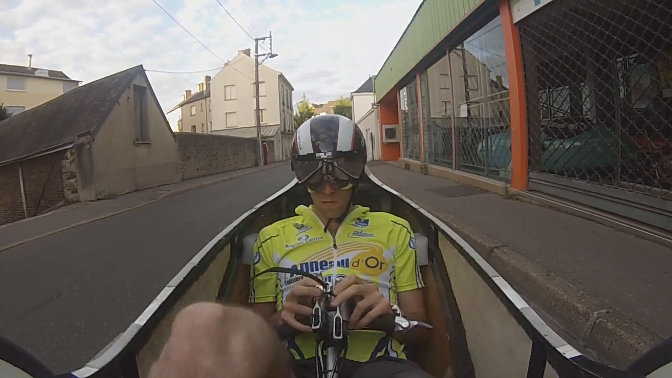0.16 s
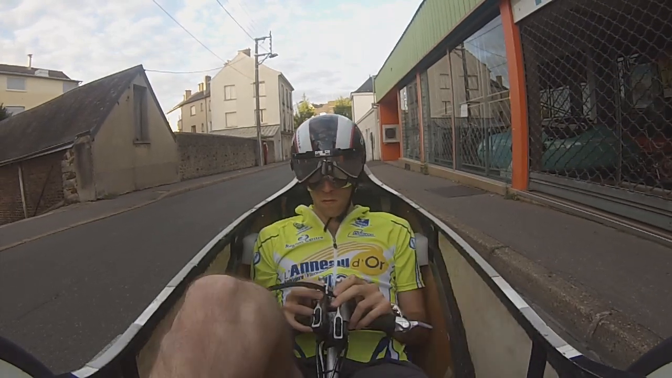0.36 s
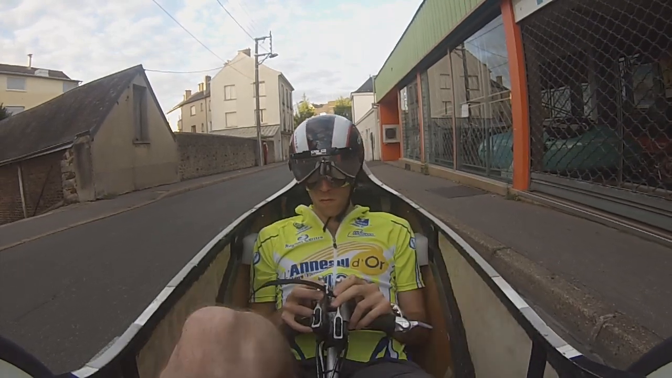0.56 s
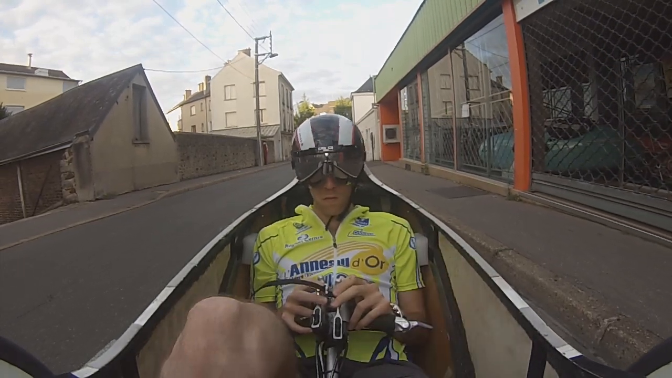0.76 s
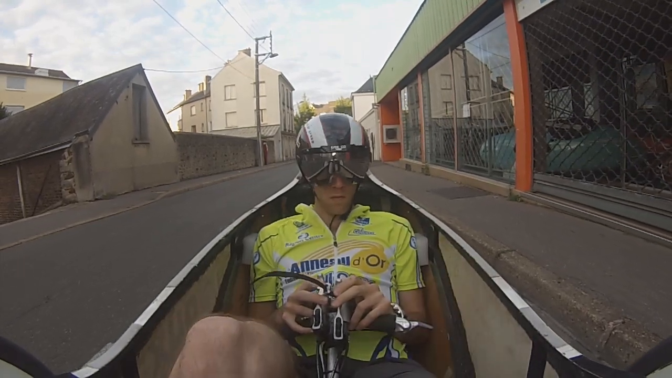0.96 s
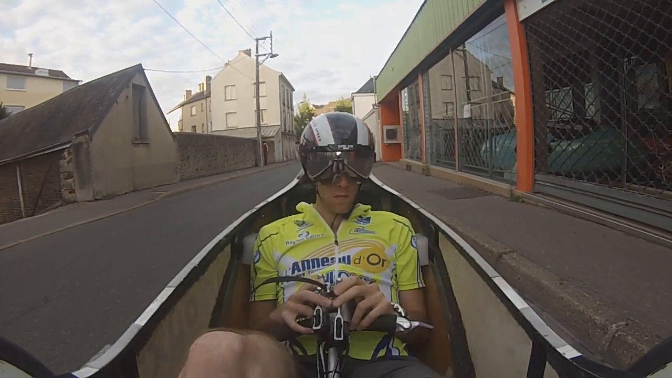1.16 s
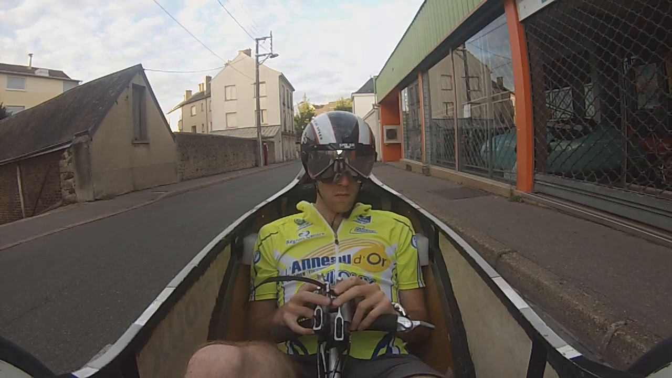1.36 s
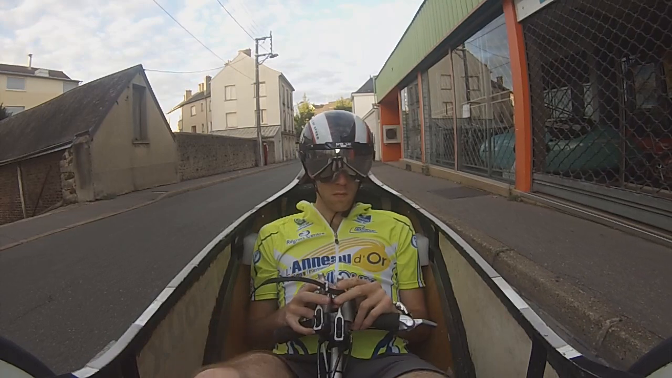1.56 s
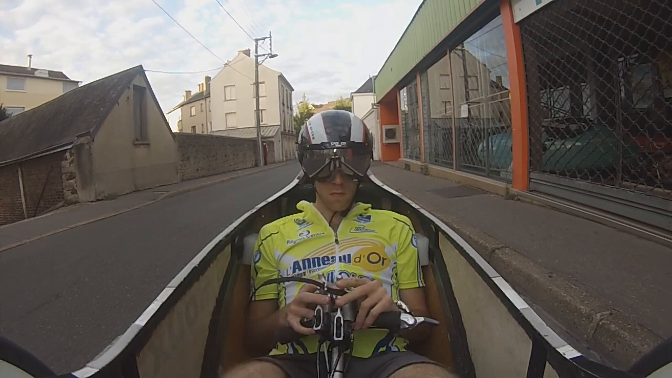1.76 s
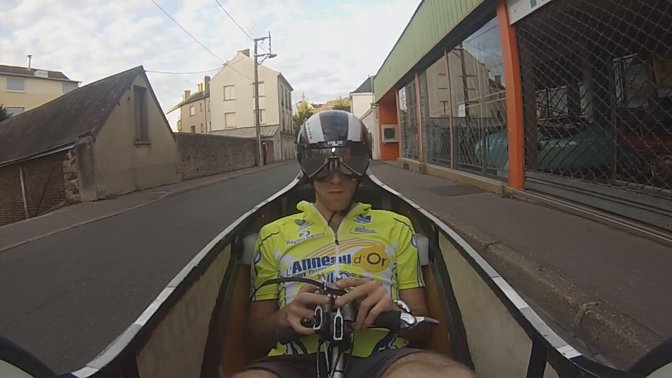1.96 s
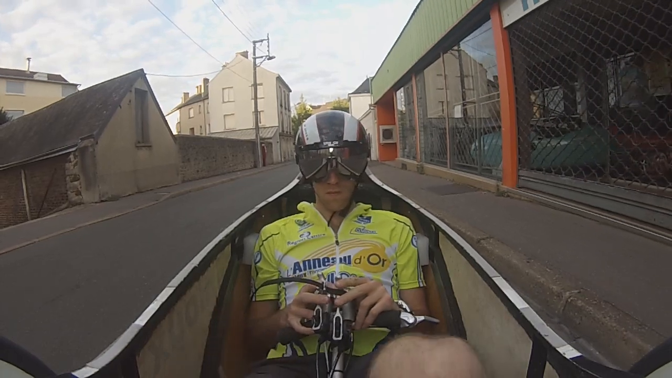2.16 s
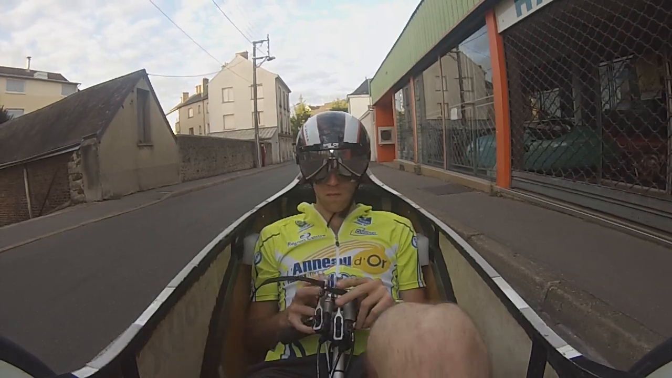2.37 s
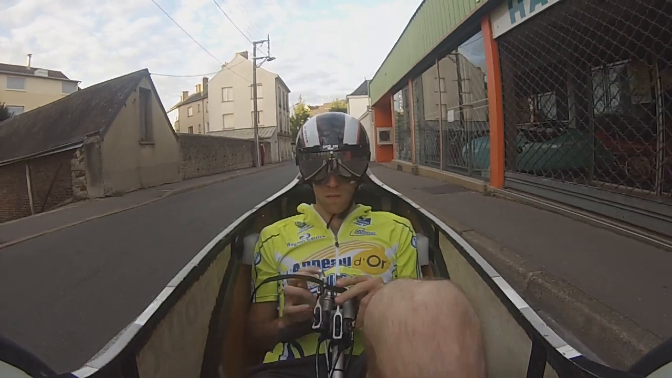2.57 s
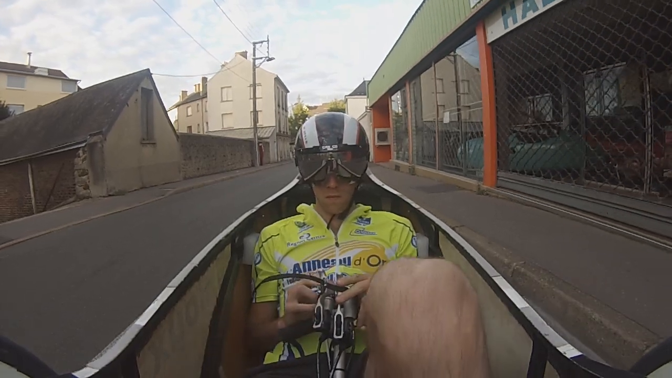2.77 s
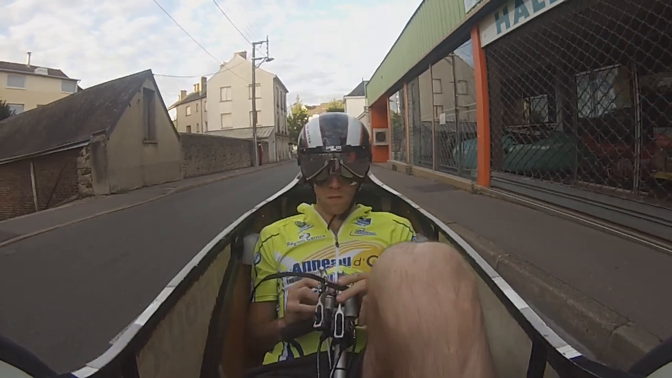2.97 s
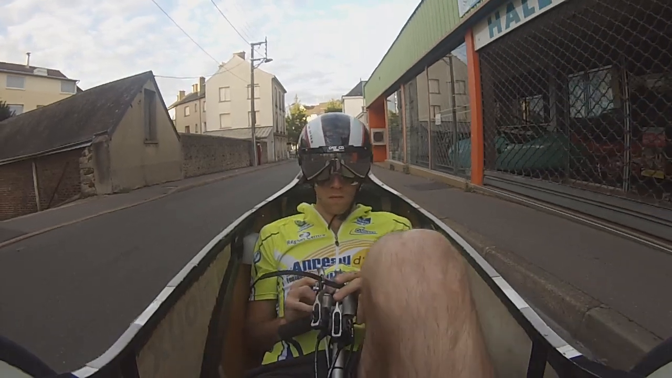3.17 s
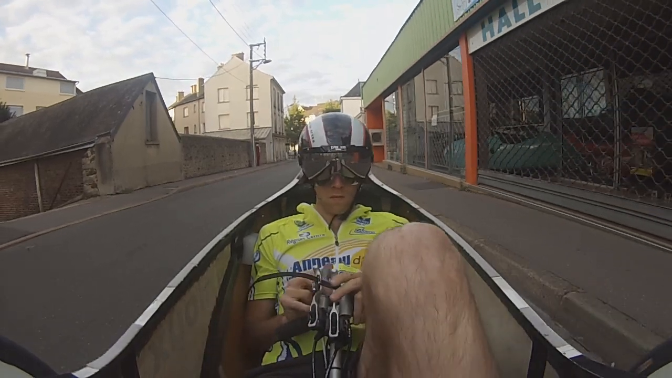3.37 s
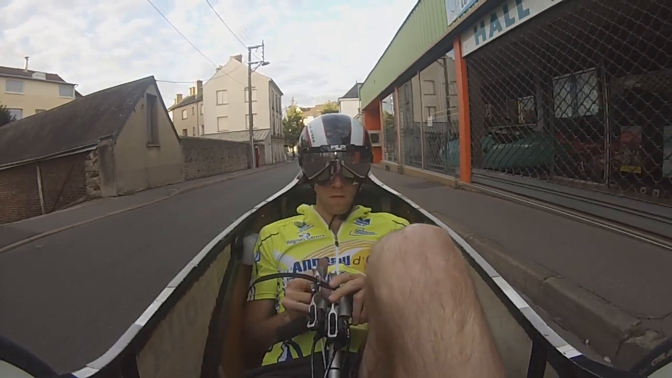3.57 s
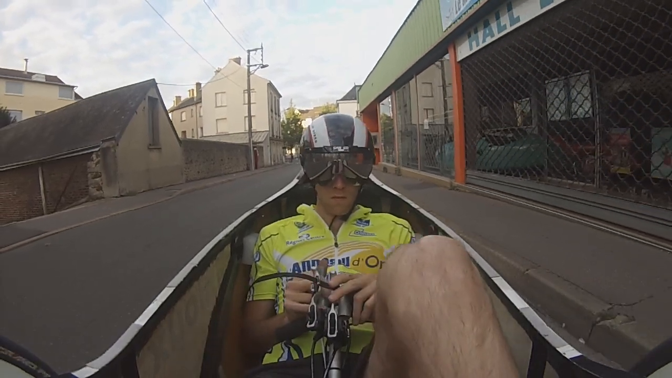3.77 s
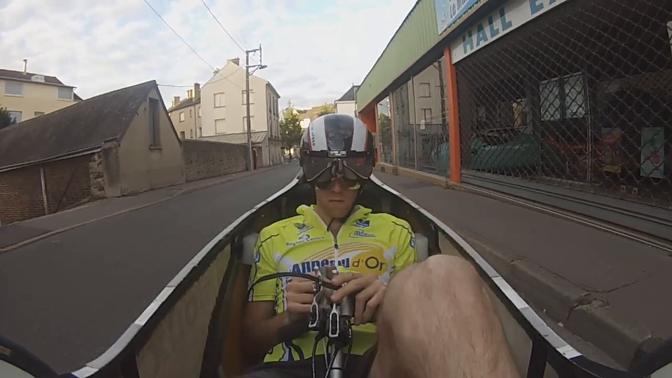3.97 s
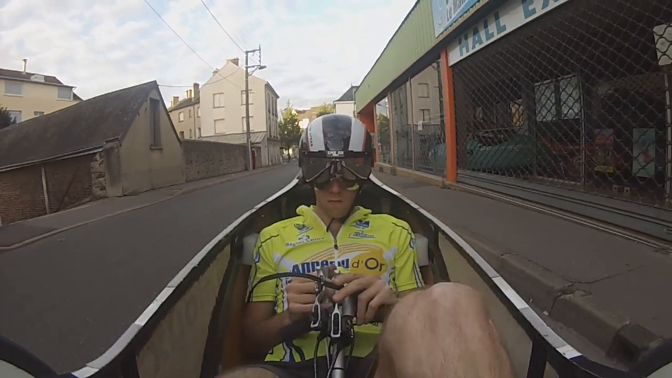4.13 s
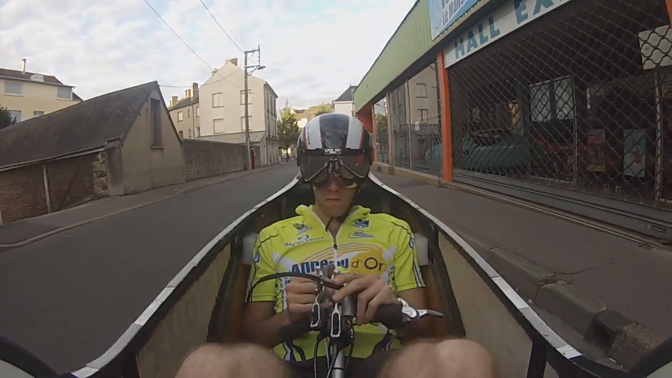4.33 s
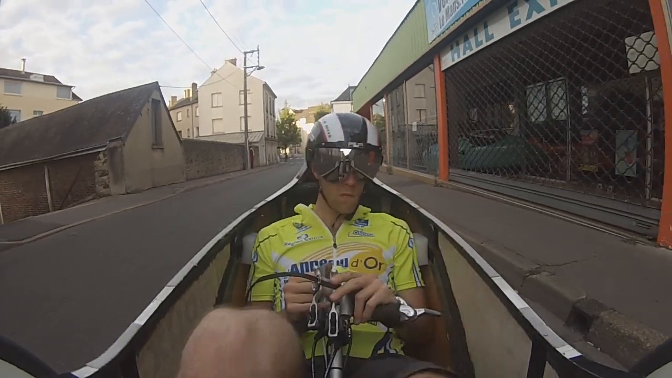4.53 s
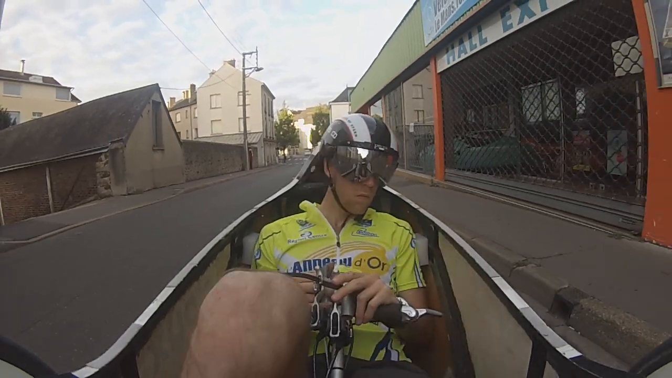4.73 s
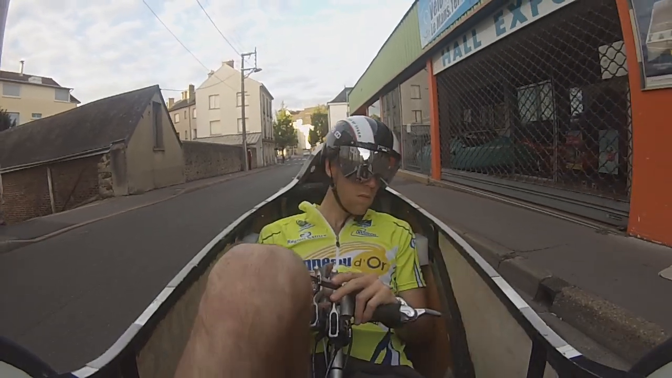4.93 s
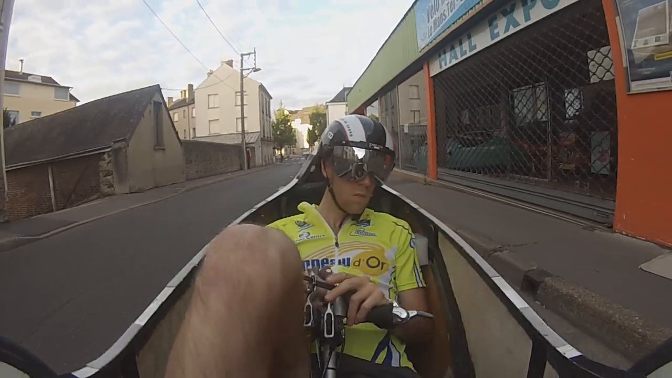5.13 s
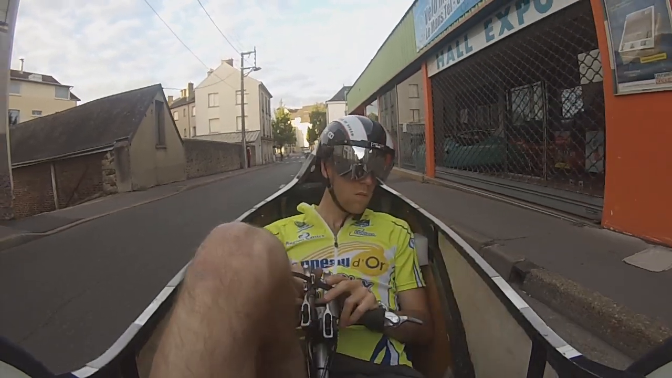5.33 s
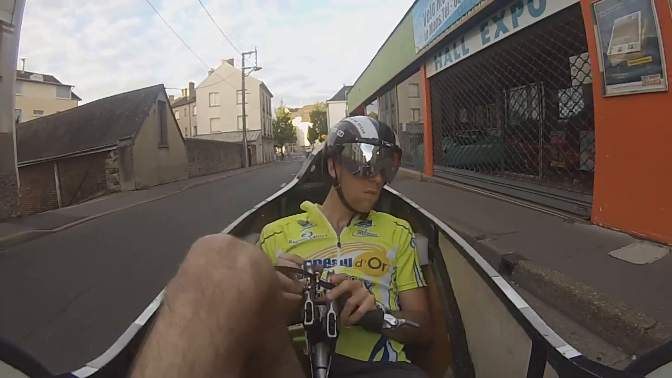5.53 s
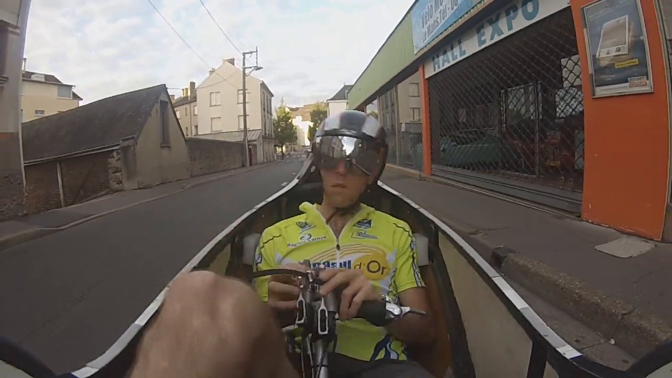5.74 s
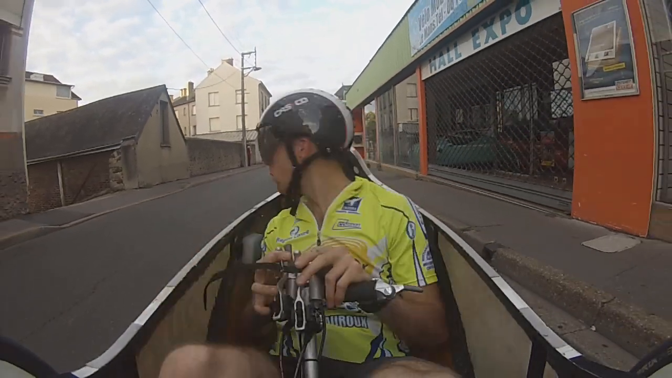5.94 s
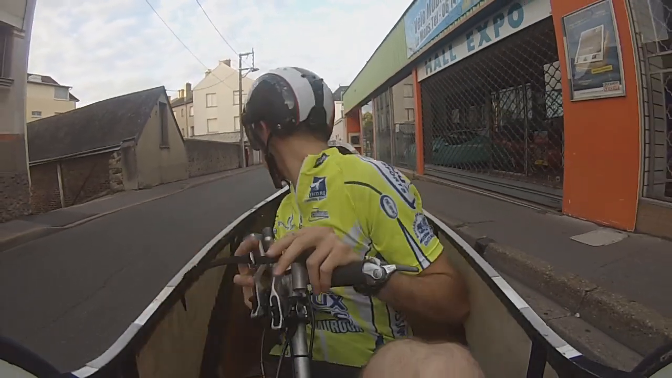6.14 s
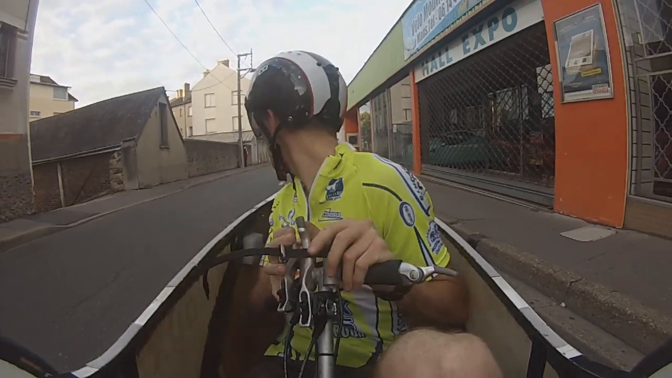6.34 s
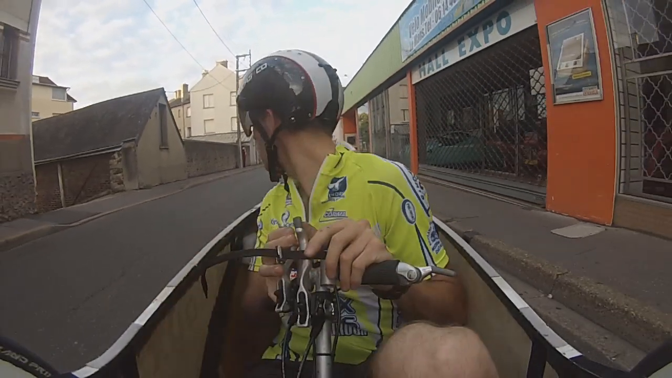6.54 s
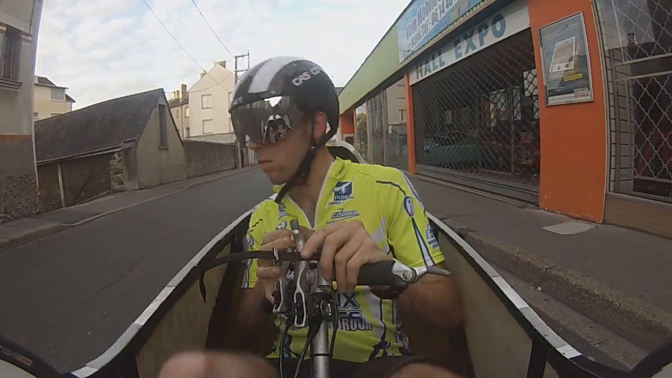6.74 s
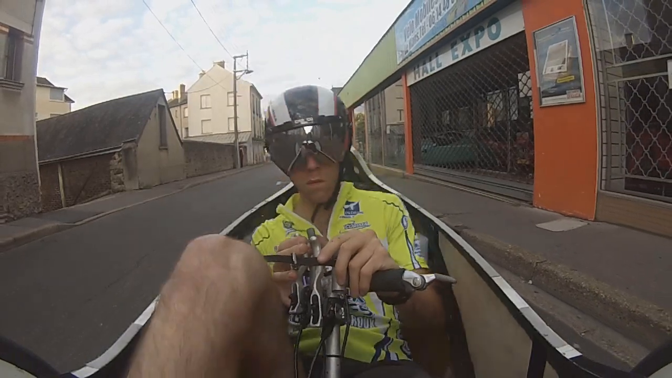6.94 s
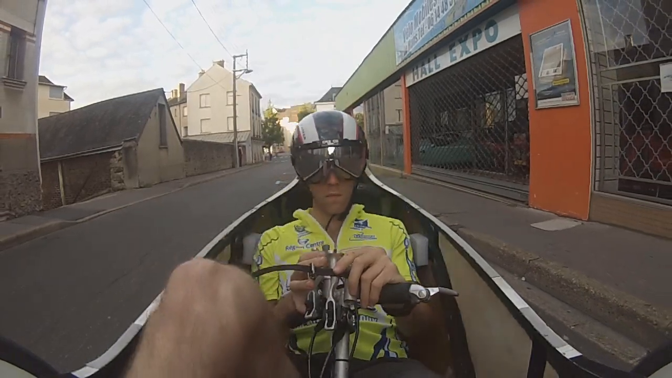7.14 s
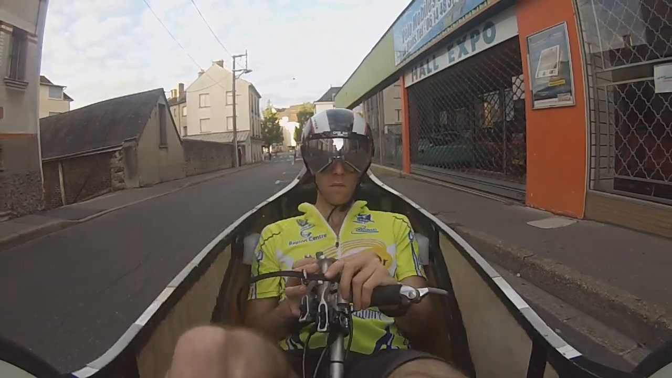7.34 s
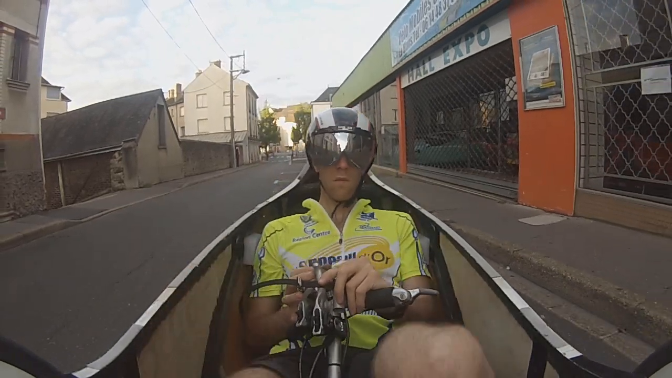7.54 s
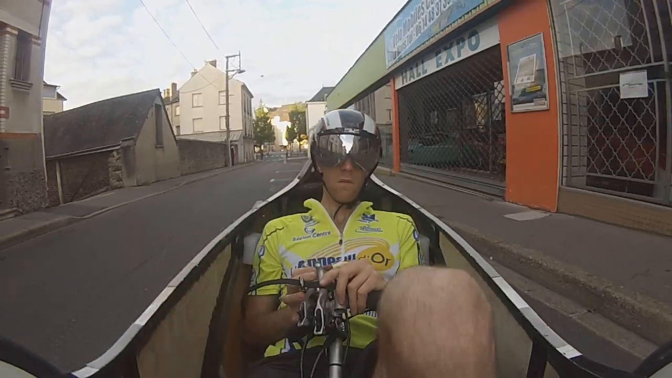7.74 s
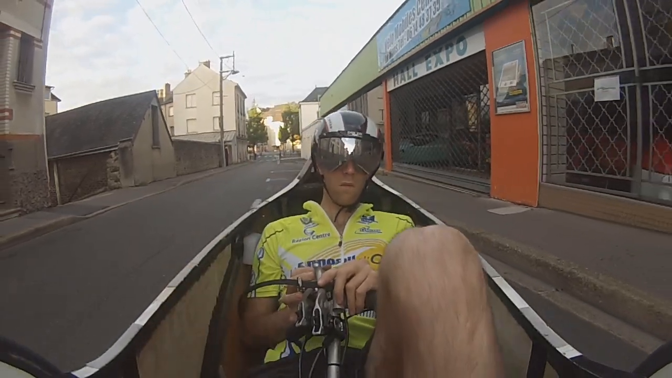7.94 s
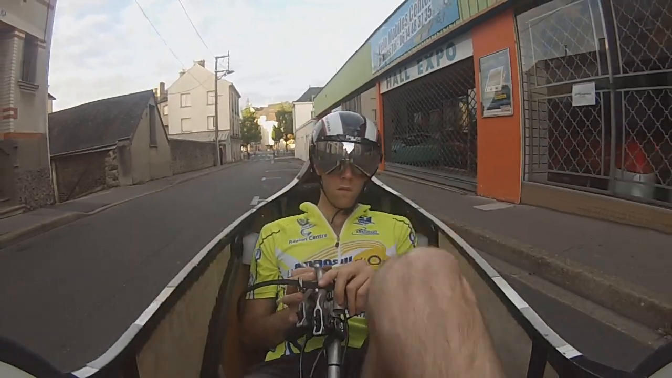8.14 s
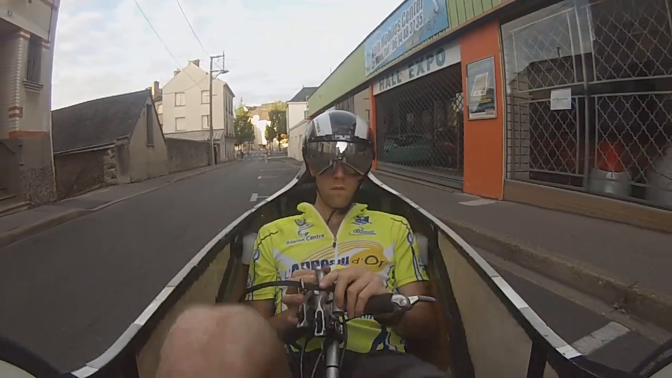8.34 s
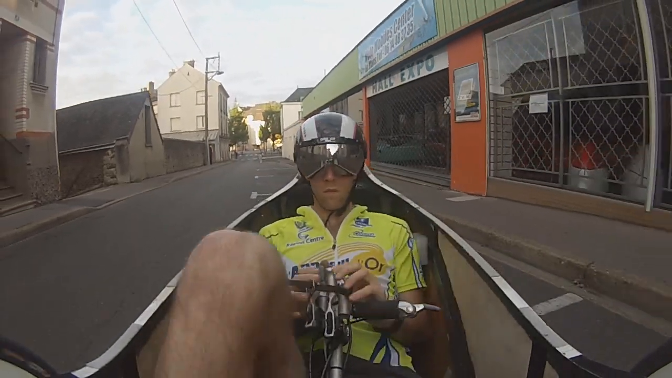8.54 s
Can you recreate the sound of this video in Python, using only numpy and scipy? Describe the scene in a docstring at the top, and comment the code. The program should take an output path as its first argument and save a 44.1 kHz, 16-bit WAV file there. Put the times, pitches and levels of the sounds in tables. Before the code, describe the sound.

Close on the hollow shell of a pedal vehicle in a street. It starts nearly silent, with small ticks, dull knocks and low rocking swells. A quick run of shifter clicks follows, then a cluster of loud, boomy body knocks. Softer bumps and chain whirr continue as the road rumble grows, with one final heavy bang near the end.

```python
"""A street, heard from the hollow shell of a velomobile that pulls away.
Filtered noise makes the drumming of the road, the whirr of the chain and a thin hiss with a flickering top.
The rocking body swells as a low tone of wandering pitch; metal parts sing as thin, unsteady tones.
Ticks, knocks, soft bumps and shifter clicks excite decaying modes and noise bursts, and the shell booms.
A limiter turns everything down for a moment after the highest peaks."""
import sys
import numpy as np
from scipy import signal
from scipy.fft import rfft, irfft, next_fast_len
from scipy.io import wavfile
from scipy.ndimage import uniform_filter1d, minimum_filter1d

SR = 44100
rng = np.random.default_rng(int(sys.argv[2]) if len(sys.argv) > 2 else 0)


def int16_out(signal):
    """Quantize to a 16-bit WAV file."""
    q = np.round(np.clip(np.atleast_2d(signal).T, -1, 1) * 32767)
    wavfile.write(sys.argv[1], SR, q.astype(np.int16))


N = 379260  # samples
T = np.arange(N) / SR
HIT_SIZE = SR // 2  # half a second for each blow
HIT_T = np.arange(HIT_SIZE) / SR
MIDDLE_PANEL_HZ = 237

# road noise: t/s, level of the hollow rumble/dB, level of the panel drumming/dB
ROAD_LEVELS = [(0.0, -49.5, -52), (0.27, -44.5, -44.5), (0.45, -50.5, -54), (0.6, -44, -50),
               (1.15, -47.5, -49), (1.33, -57.5, -57), (1.72, -54.5, -56), (1.95, -43.5, -53.5),
               (3.3, -35.5, -49), (3.68, -29.5, -46.5), (4.1, -38.5, -51), (4.6, -31.5, -37),
               (5.25, -34.5, -43.5), (6.42, -41, -52), (6.88, -38.5, -44), (7.15, -45, -58.5),
               (7.35, -35, -46.5), (8.1, -27, -35), (8.6, -24.5, -36)]
# air and body modes of the shell: nominal f/Hz, relative level/dB, t60/s
SHELL_MODES = [(111, -46.5, 0.087), (134.1, 4, 0.21), (181.2, 3, 0.15)]
# panel modes of the shell: nominal f/Hz, relative level/dB, t60/s
WALL_MODES = [(238.6, -3, 0.24), (264.7, -6.5, 0.2), (289.7, -1, 0.14), (340.3, -2.5, 0.09),
              (367.4, -3, 0.19), (432.4, 1, 0.062)]
# higher modes of the stiff ribs and rim: nominal f/Hz, relative level/dB, t60/s
RIB_MODES = [(446.4, 3, 0.2), (484, 11.5, 0.14), (535, -4, 0.31), (592, -0.5, 0.025), (603, -2, 0.14),
             (742, 4.5, 0.095), (790, -10.5, 0.18)]


def undb(db):
    """Decibels to amplitude ratio: 20 dB is a factor of ten."""
    return 10 ** (np.asarray(db) / 20)


def unit(x):
    """Normalise the mean power: rms 1."""
    return x / np.sqrt(np.mean(x ** 2))


def unit_hit(x):
    """Normalise the energy of a blow to that of 30 ms at rms 1."""
    return x / np.sqrt(np.sum(x ** 2) / (.03 * SR))


def curves(table):
    """Linear interpolation: each column after the time as a value per sample."""
    s, *columns = np.transpose(table)
    return [np.interp(T, s, c) for c in columns]


def walk(rate):
    """Smoothed random process: levels held 1 / rate s and averaged twice, at rms 1."""
    k = max(int(SR / rate), 1)
    steps = np.repeat(rng.standard_normal(N // k + 1), k)
    slewed = uniform_filter1d(uniform_filter1d(steps, k), k)
    return unit(slewed[:N])


def colour(x, points, peaks=()):
    """Minimum-phase filter: an outline (f/Hz, level/dB) with steep skirts and extra resonances."""
    size = 2 * next_fast_len(len(x) // 2 + 2048)
    f = np.maximum(np.arange(size // 2 + 1) * SR / size, 1)
    hz, db = np.transpose(points)
    octaves_outside = np.abs(np.log2(f / np.clip(f, hz.min(), hz.max())))
    gain_db = np.interp(np.log(f), np.log(hz), db) - np.minimum(30 * octaves_outside, 90)
    for centre, width, lift in peaks:
        gain_db = gain_db + lift / (1 + (2 * (f - centre) / width) ** 2)
    # folding the cepstrum onto positive time makes the filter causal
    cepstrum = irfft(np.log(undb(gain_db)))
    cepstrum[1:size // 2] *= 2
    cepstrum[size // 2 + 1:] = 0
    response = np.exp(rfft(cepstrum))
    return irfft(rfft(x, size) * response)[:len(x)]


def fade(t60):
    """Exponential damping: a fall of 60 dB in t60 seconds."""
    return np.exp(-np.log(1000) * HIT_T / t60)


def burst(t60, tail_db, tail_t60):
    """High modal density: modes too crowded to separate act as noise with two decay rates."""
    return rng.standard_normal(HIT_SIZE) * (fade(t60) + undb(tail_db) * fade(tail_t60))


def add(out, s, x):
    """Superposition: mix a sound in at time s."""
    i = max(int(s * SR), 0)
    out[i:i + len(x)] += x[:N - i]


def ring(modes, scatter_db, rise_s, favoured_hz=1, focus_db=0):
    """Modal synthesis: the place of the blow favours modes near one pitch, by focus_db an octave."""
    hz, db, t60 = np.transpose(modes)
    level_chance, pitch_chance, phase_chance = rng.standard_normal((len(hz), 3)).T
    size = undb(db - focus_db * np.abs(np.log2(hz / favoured_hz)) + scatter_db * level_chance)
    hz = hz * (1 + 0.023 * pitch_chance)
    phase = 2 * np.pi * hz[:, None] * HIT_T + 0.94 * phase_chance[:, None]
    waves = np.sin(phase) * fade(t60[:, None])
    return unit_hit(size @ waves * (1 - np.exp(-HIT_T / rise_s)))


def rolling():
    """Random excitation: asphalt grit drums the shell through the tyres; chain links rattle in their guides."""
    # noise outlines: f/Hz, relative level/dB
    rumble_colour = [(55, 2), (80, -7.5), (110, -1.5), (135, 0), (155, -11), (180, -9), (215, -5.5)]
    drum_colour = [(190, -8.5), (238, 0.5), (300, 2), (400, -12.5), (500, -11.5), (600, -20), (760, -17),
                   (930, -38.5), (1200, -45)]
    whirr_colour = [(530, -27), (900, -10.5), (1190, -8.5), (1320, -3), (1500, -8), (1660, -2),
                    (2170, -14.5), (2450, -10), (2980, -15.5), (3310, -12), (3790, -22.5), (4260, -23),
                    (4880, -14), (5770, -25.5), (6000, -21), (7800, -48.5), (13200, -120)]
    # resonances that the rolling keeps alive: f/Hz, width/Hz, added level/dB
    rumble_peaks = [(131, 7.9, 3.5)]
    drum_peaks = [(495, 61, 6.4), (753, 190, 1)]
    whirr_peaks = [(1613, 250, 5), (3500, 45, 5), (4500, 110, -1.5)]
    # the chain's whirr: t/s, level/dB
    whirr_levels = [(0.0, -60), (0.57, -58.5), (0.95, -58), (1.33, -66), (1.47, -57), (1.75, -63),
                    (2.05, -61), (3.0, -58), (4.25, -57), (5.45, -60), (6.1, -56.5), (6.4, -60.5),
                    (6.7, -60), (6.83, -53), (7.15, -62), (7.55, -56), (8.15, -55.5), (8.6, -53)]

    rumble_db, drum_db = curves(ROAD_LEVELS)
    whirr_db, = curves(whirr_levels)
    roughness = undb(3.7 * walk(40))
    rumble = colour(rng.standard_normal(N) * roughness, rumble_colour, rumble_peaks)
    drum = colour(rng.standard_normal(N) * roughness, drum_colour, drum_peaks)
    # dense tiny impacts of uneven size, about 700 a second, over a smooth slither
    links = (rng.random(N) < 700 / SR) * rng.standard_normal(N)
    slither = undb(5) * rng.standard_normal(N)
    whirr = colour((unit(links) + slither) * undb(2.0 * walk(90)), whirr_colour, whirr_peaks)
    return undb(rumble_db) * unit(rumble) + undb(drum_db) * unit(drum) + undb(whirr_db) * unit(whirr)


def sway():
    """Mass on springs: the body rocks near one low pitch over a broader shudder, in swells that rise and settle."""
    # low swells of the rocking body, and at 8.58 s a brief low burst as the sound ends: t of the widest #
    # swing/s, level/dB
    swells = [(0.71, -27), (2.24, -29.5), (2.48, -25), (2.76, -20), (3.02, -18.5), (3.28, -28), (3.78, -29),
              (5.28, -22), (5.82, -24), (6.53, -25.5), (6.84, -31.5), (7.28, -29.5), (7.70, -29),
              (7.88, -27), (8.58, -18.5)]
    rise_s, decay_s = 0.053, 0.073
    sway_hz, shudder_db = 27.2, -2.5
    # between swells the rocking follows the rumble, up to what the dampers allow
    over_rumble_db, limit_db = 3.5, -32.5

    rumble_db, _ = curves(ROAD_LEVELS)
    power = undb(np.minimum(rumble_db + over_rumble_db, limit_db)) ** 2
    for s, db in swells:
        before, after = np.minimum(T - s, 0), np.maximum(T - s, 0)
        swing = np.exp(-(before / rise_s) ** 2 / 2 - after / decay_s)
        power = power + (undb(db) * swing) ** 2
    wandering_hz = sway_hz * (1 + 0.1044 * walk(13))
    rocking = np.sin(2 * np.pi * np.cumsum(wandering_hz) / SR)
    shudder = colour(rng.standard_normal(N), [(17, 11), (28, 2.5), (42, -1.5), (60, -19)])
    return np.sqrt(power) * (unit(rocking) + undb(shudder_db) * unit(shudder))


def hiss():
    """Amplitude gating: steady noise under a treble band that flickers on several times a second."""
    # noise outlines: f/Hz, relative level/dB
    hiss_colour = [(4000, -7), (4900, -16.5), (5900, -14.5), (7300, -14.5), (9300, -13.5), (11000, -20.5),
                   (13000, -20.5), (14400, -26), (15200, -51.5)]
    flicker_colour = [(7400, -15), (8500, -2), (9400, -1), (10400, -12.5), (11300, -14.5), (12800, -6),
                      (14000, -14), (15000, -33.5)]
    steady_db, flicker_db, spread_db = -70.5, -66, 1.5
    per_s, jitter_s, length_s = 9, .035, .015

    steady = unit(colour(rng.standard_normal(N), hiss_colour))
    fizz = unit(colour(rng.standard_normal(N), flicker_colour))
    gate = np.zeros(N)
    chances = rng.standard_normal((int(per_s * N / SR), 2))
    for k, (late, size) in enumerate(chances):
        s = min(k / per_s + jitter_s * late, T[-1])
        add(gate, s, np.full(int(length_s * SR), undb(spread_db * size)))
    return undb(steady_db) * steady + undb(flicker_db) * gate * fizz


def small_ticks():
    """Impact excitation: each tick is a short burst of crowded modes, with ringing ribs and a bright edge."""
    # the clearest ticks, from chain, levers and the rider's small movements:
    # t/s, ring level/dB, edge level/dB
    clear_ticks = [(0.1065, -48, -60.5), (0.181, -48.5, -63.5), (0.2461, -46.5, -65), (0.322, -51.5, -70),
                   (0.5009, -36.5, -57), (0.5447, -36, -56), (0.7321, -49.5, -66), (0.956, -43, -64),
                   (1.4002, -56, -76), (1.5879, -51.5, -65), (1.6234, -53.5, -70), (1.6849, -48.5, -61),
                   (1.734, -50, -63), (3.9436, -50, -64.5), (4.1097, -55, -69), (4.1888, -54, -71),
                   (4.9162, -57, -59), (5.8097, -51.5, -76), (5.8549, -48, -49.5), (6.787, -48, -57),
                   (6.8169, -51.5, -61), (6.904, -46, -68), (7.235, -55, -58.5), (7.679, -44.5, -56),
                   (8.5574, -58, -60)]
    # noise outline of the ring: f/Hz, relative level/dB
    tick_colour = [(530, -24.5), (900, -19.5), (1060, -20), (1250, -11), (1500, -5), (1660, -4), (1910, -4),
                   (2160, -28.5), (2570, -11), (2970, -47), (3200, -8.5), (4160, -65.5), (7040, -120)]
    edge_colour = [(3100, -1), (4000, -3), (5200, 1.5), (5900, -12.5), (6900, -8), (7800, -26)]
    # fainter ticks fall at random
    faint_count, faint_ring_db, faint_edge_db, faint_spread_db = 10, -61.5, -74, 1

    faint_ticks = []
    for when, size in rng.random((faint_count, 2)):
        offset_db = faint_spread_db * (2 * size - 1)
        faint_ticks.append((when * N / SR, faint_ring_db + offset_db, faint_edge_db + offset_db))
    out = np.zeros(N)
    for s, ring_db, edge_db in [*clear_ticks, *faint_ticks]:
        body = unit_hit(colour(burst(0.066, -15.0, 0.06), tick_colour, [(1608, 97, 12.2)]))
        ribs = ring(RIB_MODES, scatter_db=2, rise_s=0.00084)
        edge = unit_hit(colour(burst(0.019, 3, 0.068), edge_colour))
        add(out, s, undb(ring_db) * (body + undb(-8.0) * ribs) + undb(edge_db) * edge)
    return out


def knocks():
    """Modal excitation: each blow smacks at the contact, rings frame, ribs and panels and swells into a boom."""
    # knocks on the shell: t/s, panel level/dB, nominal f of the struck panel/Hz, then relative to
    # the panel level: boom level/dB, crack level/dB, edge level/dB, hard contact level/dB
    blows = [(0.236, -41, 473, 4, -31, -36, -29), (0.585, -35.5, 240, 5, -15, -42, -31),
             (0.992, -21, 318, -3.5, -30, -60, -35), (1.542, -36, 337, 1.5, -12.5, -34, -39),
             (1.831, -28, 321, -4.5, -14, -44, -31), (2.423, -19, 342, -5.5, -18, -28.5, -47),
             (2.674, -33.5, 246, -14, -28, -28, -28), (2.708, -27.5, 247, 7.5, -20, -26, -26),
             (3.108, -39.5, 308, 9.5, -21, -41, -23), (3.743, -21.5, 206, 1, -24, -36, -32),
             (4.335, -7, 233, 1, -22, -32, -28), (4.537, -8.5, 272, -5.5, -25.5, -37, -33),
             (4.649, -6.5, 208, -1, -21, -30, -30), (4.935, -19.5, 233, 4, -8.5, -27.5, -32),
             (5.169, -16, 229, 2, -14.5, -40.5, -36.5), (5.435, -29, 246, 4.5, -24, -60, -57),
             (7.22, -27, 262, 2.5, -21, -47, -30.5), (7.507, -22.5, 216, 10, -20.5, -25.5, -25),
             (7.751, -18, 238, 1.5, -29.5, -29, -24), (7.95, -2.5, 238, -13, -18.5, -34, -13.5)]
    # modes of the metal frame: nominal f/Hz, relative level/dB, t60/s
    frame_modes = [(1204, 4.5, 0.1), (1450, -9, 0.092), (1506, -1.5, 0.14), (1720, -10.5, 0.066),
                   (1910, 21.5, 0.11), (2260, -11, 0.084), (2840, -22.5, 0.077), (3570, -11.5, 0.19),
                   (5000, -17, 0.13), (5200, -27.5, .14)]
    # outlines of the contact, crack and edge: f/Hz, relative level/dB
    contact_colour = [(330, -0.5), (750, 3), (950, 3.5), (1400, -4.5), (2000, -12.5), (2650, 1.5),
                      (3000, -26.5), (5000, -51), (9000, -37), (14000, -50)]
    crack_colour = [(500, -28.5), (850, -28.5), (909, -5), (1120, -1), (1230, 3.5), (1460, 0.5),
                    (1680, 11.5), (1950, -1.5), (2640, -10), (2930, -19.5), (3080, -27.5), (3200, -14),
                    (4160, -54), (7040, -120)]
    edge_colour = [(2800, 4), (3300, 4), (3700, -4.5), (4300, -1.5), (4900, 3.5), (5500, -10.5),
                   (6900, -14), (7600, -17.5), (9000, -22.5), (11500, -29), (14500, -59.5)]
    thud_colour = [(70, -3), (110, 9.5), (200, -8.0)]
    slap_colour = [(350, 0), (600, 5.5), (780, -6.5), (950, -19.5)]
    # a gentle blow pushes for longer, so more of its boom is a deep thud
    middle_thud_db, thud_fall_per_db, middle_knock_db = -9.5, 0.5053, -23.5
    # the ribs clack more when a blow cracks loudly and lands on a small, high-pitched panel
    base_clack_db, clack_per_crack, clack_db_per_octave = -1.5, 0.66, 12

    out = np.zeros(N)
    for s, db, hz, boom_db, crack_db, edge_db, contact_db in blows:
        smack = fade(0.00005) + undb(-12.5) * burst(0.021, -23.5, 0.066)
        contact = unit_hit(colour(smack, contact_colour))
        boom = ring(SHELL_MODES, scatter_db=1.0, rise_s=0.0048)
        thud = unit_hit(colour(burst(0.19, -19.0, 0.13), thud_colour))
        # the struck panel swings hard for a few cycles; its neighbours ring on more softly
        struck = ring([(hz, 0, .05)], scatter_db=0, rise_s=0.0028)
        panels = ring(WALL_MODES, scatter_db=4.5, rise_s=0.00091, favoured_hz=hz, focus_db=11.5)
        clack = ring(RIB_MODES, scatter_db=3.5, rise_s=0.0024)
        slap = unit_hit(colour(burst(0.007, -10.0, 0.071), slap_colour))
        crack = unit_hit(colour(burst(.07, -15, 0.22), crack_colour, [(2160, 80, -9.5)]))
        frame = ring(frame_modes, scatter_db=2, rise_s=0.00053)
        edge = unit_hit(colour(burst(0.03, 6.0, 0.091), edge_colour))

        panel_octaves = np.log2(hz / MIDDLE_PANEL_HZ)
        clack_db = base_clack_db + clack_per_crack * crack_db + clack_db_per_octave * panel_octaves
        thud_db = middle_thud_db - thud_fall_per_db * (db - middle_knock_db)
        low = struck + undb(-1.5) * panels + undb(boom_db) * (boom + undb(thud_db) * thud)
        middle = undb(clack_db) * (clack + undb(-4.5) * slap)
        high = undb(crack_db) * (crack + undb(-12.5) * frame)
        high = high + undb(edge_db) * edge + undb(contact_db) * contact
        add(out, s, undb(db) * (low + middle + high))
    return out


def metal_tones():
    """Frequency modulation: thin tones of metal parts swell and fade while their pitch wavers."""
    # thin tones of metal parts, rubbed or left ringing by a knock:
    # start t/s, end t/s, mean f/Hz, middle level/dB
    tones = [(.38, 1.2, 1610, -58), (.38, 1.2, 3200, -70), (2.25, 3.05, 4850, -70), (4.9, 5.25, 5020, -73),
             (7.72, 8.0, 5030, -67)]
    out = np.zeros(N)
    for start, end, hz, db in tones:
        progress = np.clip((T - start) / (end - start), 0, 1)
        swell = np.sqrt(np.abs(np.sin(np.pi * progress)))
        # the pitch drifts slowly and shivers quickly
        unsteady_hz = hz * (1 + 0.0051 * walk(7) + .011 * walk(520))
        phase = 2 * np.pi * np.cumsum(unsteady_hz) / SR
        out += undb(db + 3 * walk(25)) * swell * np.sin(phase)
    return out


def road_bumps():
    """Compliant contact: a tyre cushions each bump, so the shell thumps without any crack."""
    # small bumps in the asphalt, felt through the tyres: t/s, level/dB
    bumps = [(2.05, -43), (3.854, -32.5), (4.255, -42.5), (4.426, -26), (5.60, -44), (5.812, -33.5),
             (5.992, -35.5), (6.204, -39.5), (6.283, -45), (6.523, -40.5), (6.564, -38), (6.657, -40),
             (6.822, -37), (6.849, -33), (8.201, -28.5), (8.312, -36), (8.477, -34)]
    boom_db, push_db, push_rise_s = -4, -13, 0.0066
    out = np.zeros(N)
    for s, db in bumps:
        panels = ring(WALL_MODES, scatter_db=4.5, rise_s=0.003, favoured_hz=MIDDLE_PANEL_HZ, focus_db=21)
        boom = ring(SHELL_MODES, scatter_db=2.7, rise_s=0.004)
        thump = unit_hit((panels + undb(boom_db) * boom) * fade(.2))
        soft_burst = burst(0.077, -15, 0.08) * (1 - np.exp(-HIT_T / push_rise_s))
        push = unit_hit(colour(soft_burst, [(220, 3), (500, -9.5), (780, -19)]))
        add(out, s, undb(db) * (thump + undb(push_db) * push))
    return out


def shifter():
    """Structure-borne sound: the ratchet snaps into its notches; the tiller carries the jolt into the shell."""
    # snaps of the gear shifter: t/s, overall gain/dB
    snaps = [(3.3756, -20), (3.4282, -21.5), (3.5122, -21), (3.669, -23.5)]
    # noise outline of the snap: f/Hz, relative level/dB
    snap_colour = [(1000, -20.5), (1250, -16), (1400, -10), (1650, 6.5), (1850, -13), (2120, -28),
                   (2480, -8), (2750, -31), (3300, -10), (3700, -20.5), (4900, -12.5), (6000, -22),
                   (9400, -24), (15500, -38)]
    lever_modes = [(712, 2.5, 0.1), (1380, 0.0, 0.099), (1730, -1.0, 0.071), (2730, -6.5, 0.064)]
    out = np.zeros(N)
    for s, db in snaps:
        snap = unit_hit(colour(burst(0.013, -17.5, 0.14), snap_colour))
        lever = ring(lever_modes, scatter_db=3.5, rise_s=0.00012)
        clack = ring(RIB_MODES, scatter_db=8.0, rise_s=0.013)
        panel = ring(WALL_MODES, scatter_db=11.5, rise_s=0.00054)
        boom = ring(SHELL_MODES, scatter_db=0.0, rise_s=0.014)
        shell = undb(-21.0) * clack + undb(-11.0) * panel + undb(-7) * boom
        add(out, s, undb(db) * (undb(-15) * snap + undb(-19.5) * lever + shell))
    return out


def limiter(x):
    """Gain control: a peak over the limit cuts the gain, which holds, then climbs back steadily in dB."""
    limit_db, attack_s, hold_s, release_db_per_s = -.5, 0.0013, 0.13, 10
    over_db = 20 * np.log10(np.maximum(np.abs(x) / undb(limit_db), 1))
    hold = int(hold_s * SR)
    held_db = -minimum_filter1d(-over_db, hold, origin=(hold - 1) // 2)
    climb_db = release_db_per_s * T
    cut_db = np.maximum.accumulate(held_db + climb_db, axis=-1) - climb_db
    smooth_cut_db = uniform_filter1d(cut_db, max(int(attack_s * SR), 1))
    return x * undb(-smooth_cut_db)


def scene():
    """Superposition: all sources add at one microphone on the shell."""
    lasting = rolling() + sway() + hiss() + metal_tones()
    struck = small_ticks() + knocks() + road_bumps() + shifter()
    return (lasting + struck)[None]


def record(dry):
    """Limiting, clipping at full scale, then band limitation by a steep low-pass at 16 kHz."""
    low_pass = signal.ellip(8, .2, 70, 16000, fs=SR, output="sos")
    return signal.sosfilt(low_pass, np.clip(limiter(dry), -1, 1))


dry = scene()
out = record(dry)
int16_out(out)
```